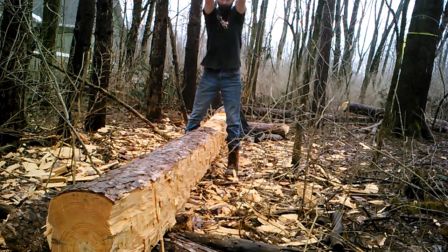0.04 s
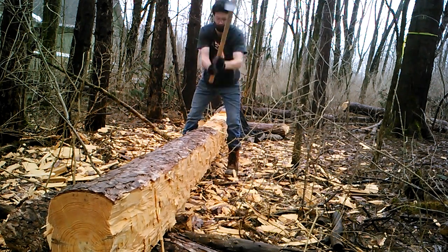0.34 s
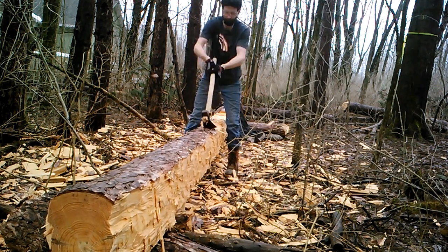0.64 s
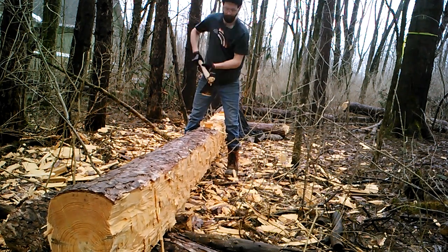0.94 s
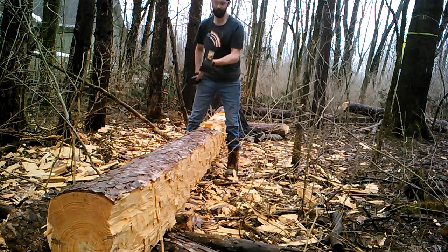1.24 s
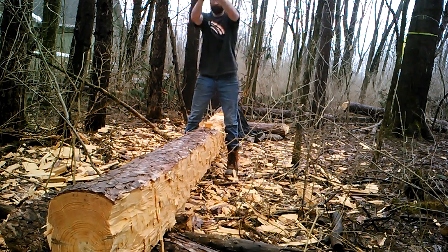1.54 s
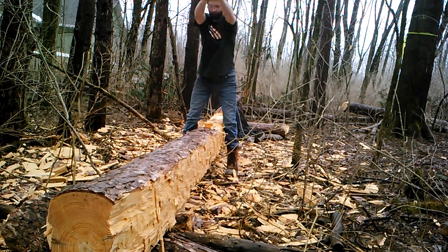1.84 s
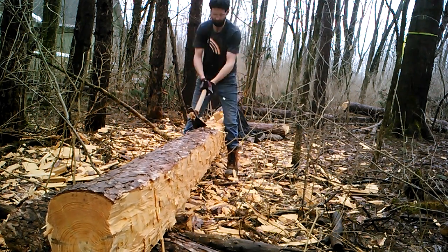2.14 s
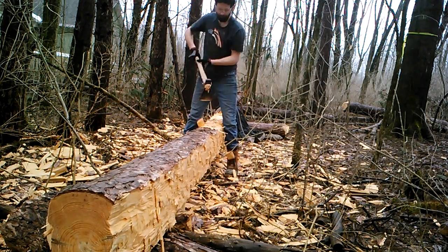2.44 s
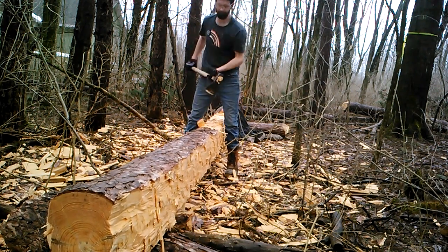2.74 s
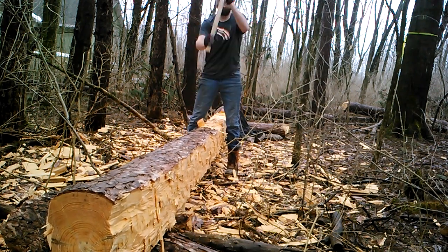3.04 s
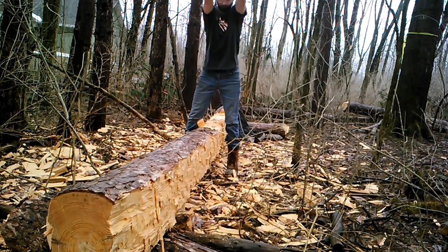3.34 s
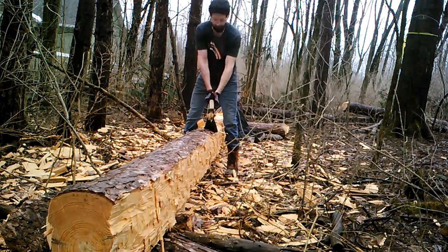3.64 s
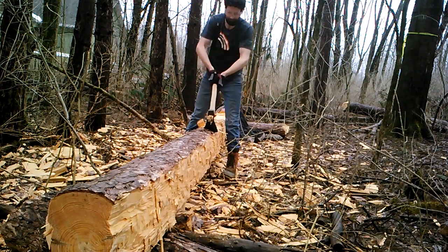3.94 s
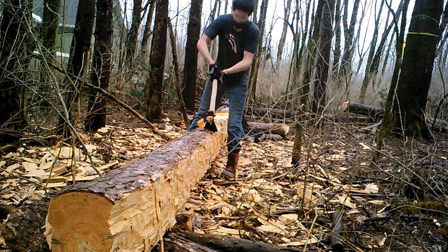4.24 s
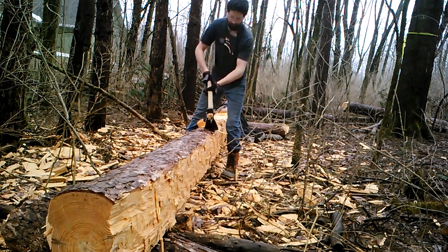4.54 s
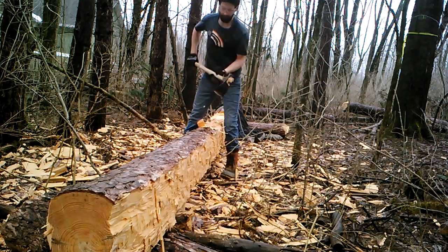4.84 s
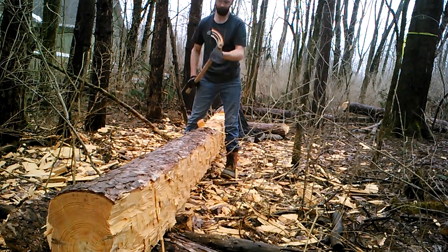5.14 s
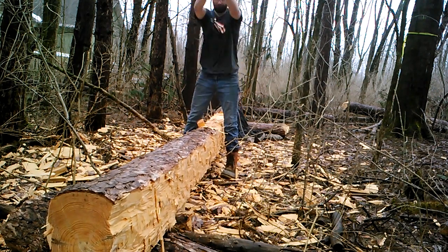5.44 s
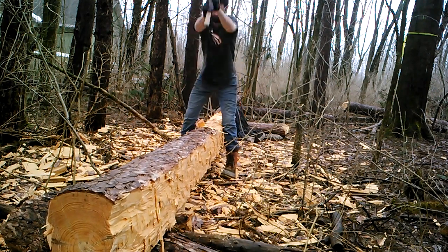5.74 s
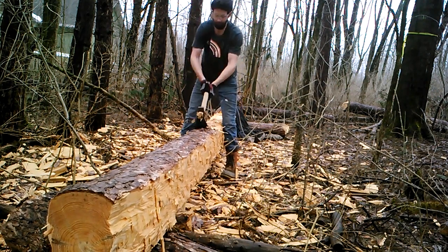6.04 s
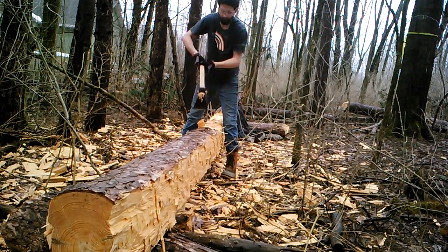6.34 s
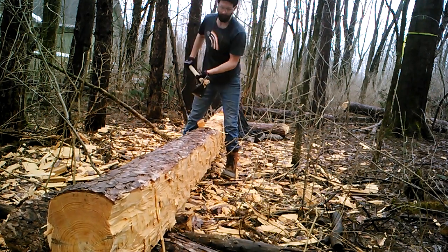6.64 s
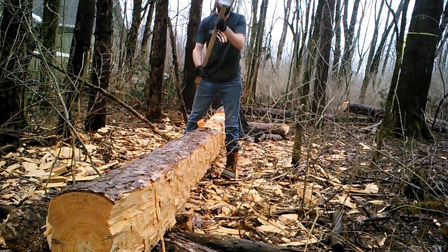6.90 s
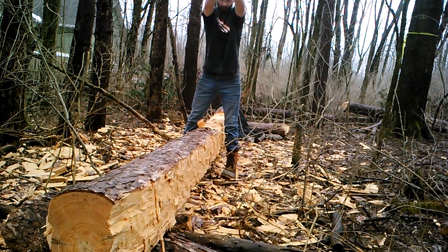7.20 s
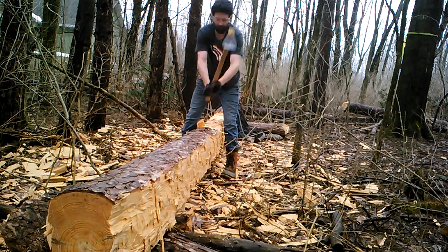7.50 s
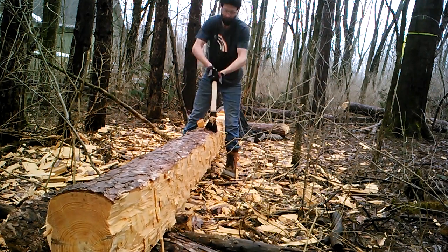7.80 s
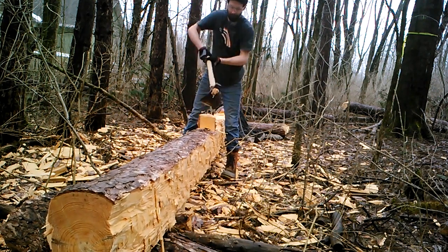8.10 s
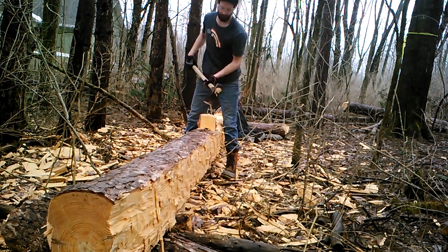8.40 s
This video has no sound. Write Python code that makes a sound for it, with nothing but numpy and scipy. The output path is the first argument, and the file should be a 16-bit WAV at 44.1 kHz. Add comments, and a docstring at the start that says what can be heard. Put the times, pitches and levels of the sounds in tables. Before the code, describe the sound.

Five loud, evenly paced adze strikes bite into a log, each a thud with a sharp crack, a brief hollow ring and a woodland echo. After each, the blade pulls free with dry snaps and crackles, the third time with a loud burst of splintering. Faint upswing rustles, settling chips and two tiny bird chirps lie over quiet air. The microphone, a few metres off, distorts slightly on the hits.

```python
"""In bare woodland, five heavy blows of an adze (an axe with a crosswise blade) land in a long log.
Each blow thuds, splits fibres and sets the log ringing; the trunks scatter the sound back.
Levering the blade free tears and snaps splinters, which drop into dry leaves, and the worker rustles
on each upswing between blows. A small bird chirps twice over quiet air.
The blows overload a microphone a few metres away."""
import sys
import numpy as np
from scipy import signal
from scipy.fft import rfft, irfft
from scipy.io import wavfile
from scipy.ndimage import uniform_filter1d

SR = 44100
rng = np.random.default_rng(int(sys.argv[2]) if len(sys.argv) > 2 else 0)


def materialize(psi):
    """Save the field psi as 16-bit PCM at rate SR to the path in sys.argv[1].

    A 1-D psi becomes a single channel; in a 2-D psi each row is a channel.
    """
    bounded = np.clip(np.atleast_2d(psi).T, -1, 1)
    quanta = np.round(bounded * 32767).astype(np.int16)
    wavfile.write(sys.argv[1], SR, quanta)


N = 381906

# Tone of the quiet air: frequency_hz, relative_db
AIR_TONE = [(19, -28), (32, -1), (83, -1.5), (133, -5.5), (191, -12.5), (296, -14.5), (497, -15),
            (595, -17), (695, -14), (1760, -24.5), (2010, -26), (2470, -27), (6770, -28.5), (9000, -31),
            (15500, -31)]
# Far echo of the woods: frequency_hz, relative_db, fade_s (a fade time is the time to drop by 60 dB)
FAR_ECHO = [(60, -17, 1.5), (300, -18, .7), (534, -16.5, 1.92), (1500, -13, 1.41), (3050, -8.5, 1.14),
            (7000, -12.5, 0.93), (10000, -10, 0.65), (15000, -22, .5)]
# Bird chirps: start_s, length_s, start_pitch_hz, end_pitch_hz, level_db
BIRD_CHIRPS = [(1.881, .028, 6350, 7230, -46.5), (7.557, 0.03, 7360, 7900, -53)]
# Tones of a splinter's bright snap and a chip's hollow body: frequency_hz, relative_db
SNAP_TONE = [(300, -35), (1500, -26.5), (3000, -4), (5000, -2), (6400, 5.5), (7500, 3), (8700, -9),
             (10500, -14), (13000, -7.5), (16000, -17)]
BODY_TONE = [(150, -38), (700, -3.5), (1100, 11), (2200, 8), (3200, -24), (8000, -19)]
# Fibres tearing as the blade comes free: middle_s, half_length_s, level_db, body_db (against the snap)
FIBRE_TEARS = [(0.733, 0.038, -39, -13), (2.327, 0.014, -40, -10), (3.956, 0.029, -32, -25),
               (4.304, 0.015, -27.5, -19), (4.338, .026, -29, -12.5), (4.732, .024, -38.5, -8),
               (6.286, .022, -37, 0), (7.884, 0.028, -34, -2.5), (7.951, 0.022, -30.5, -5)]
# Loudest snaps of breaking and tumbling wood: start_s, peak_db, body_db (against the snap)
WOOD_SNAPS = [(0.734, -9, -10), (.845, -19, -17), (1.168, -25.5, -12), (1.513, -32.5, -13),
              (2.319, -6, -22), (2.615, -19, 6), (2.793, -27.5, -1.5), (2.91, -27.5, -8.5),
              (2.963, -31, 8.5), (3.939, -7, -33), (4.2977, -0.5, -21), (4.3188, 2.5, -26),
              (4.3346, 0.5, -17.5), (4.3374, 2, -25), (4.592, -24, -10), (4.736, -19.5, -9),
              (4.750, -16.5, -27.5), (5.298, -31, -18), (6.166, -9, -25), (6.192, -15.5, 3),
              (6.297, -10, 3.5), (6.662, -27, -13), (7.932, -17, 16), (7.95, -10, 0.5)]
# Notes the log rings at, the lowest being a dull thump of the blow into the ground: pitch_hz, relative_db,
# fade_s
LOG_NOTES = [(55, -31.5, 0.55), (97, -18, .25), (116, -11, 0.15), (134.7, -5.5, 0.403), (155, -30, 1.24),
             (148.3, -16.5, 0.47), (174.2, -4.5, 0.56), (200.2, -11.5, 0.46), (219, -13.5, .16),
             (264.1, -18.5, 0.39), (288.3, -15, 0.39), (345, -14, 0.28), (404.3, -8, 0.29),
             (453.5, -6.5, 0.18), (510.2, -6, 0.11), (595.8, -5, 0.12), (713.5, -14.5, 0.19),
             (784, -19.5, 0.31)]
# Tones of the blade's thud and the crack of splitting fibres: frequency_hz, relative_db
THUD_TONE = [(25, -10.5), (70, -10.5), (130, 4), (350, -2), (600, -3.5), (950, -1), (1400, -4), (1700, -9),
             (2200, -13), (2700, -19), (5000, -27), (16000, -48)]
CRACK_TONE = [(300, -41), (1500, -19.5), (2800, -6), (4000, -2.5), (5500, 0.5), (7200, 2), (8200, -5),
              (9800, -20.5), (12500, -12), (16000, -29.5)]
# Adze blows, with relative levels: start_s, thud_db, knock_db, crack_db, ring_db,
# ring_tilt_db_per_octave, deep_notes_db, slab_pitch_hz, slab_db
ADZE_BLOWS = [(0.4895, 4, 2.5, 1.5, -7, 5, 8.5, 916, 6.5), (2.1180, 1, -2, 3.5, -3, 1, 5.5, 1463, 10.5),
              (3.6991, -1, -19, 2, 1, -1.5, -1.5, 1214, 3.5),
              (5.9993, -2.5, -3, 4.5, -0.5, -0.5, 1.5, 480.3, 5.5),
              (7.6547, 0, -1, -1.5, 1, 0, -1.5, 315, 0)]


def undb(db):
    """Turn decibels into a number to multiply by."""
    return 10 ** (np.asarray(db) / 20)


def unit(x):
    """Scale a sound to an average strength (rms) of 1."""
    return x / np.sqrt(np.mean(x ** 2))


def fade(t, fade_s):
    """Die away by 60 dB every fade_s seconds."""
    return np.exp(-np.log(1000) * t / fade_s)


def add(track, start_s, sound):
    """Mix a sound into a track at the given time."""
    i = max(int(start_s * SR), 0)
    track[i:i + len(sound)] += sound[:max(len(track) - i, 0)]


def colour(x, tone, size=4096):
    """Filter a sound to follow a tone table; white noise keeps its strength."""
    hz, db = np.transpose(tone)
    log_hz = np.log(np.maximum(np.fft.rfftfreq(size, 1 / SR), 1))
    gains = undb(np.interp(log_hz, np.log(hz), db))
    # build the filter so that it rings only after a hit, never before it
    cepstrum = irfft(np.log(gains))
    one_sided = 2 * cepstrum[:size // 2] * (np.arange(size // 2) > 0)
    response = irfft(np.exp(rfft(one_sided, size)))
    return signal.oaconvolve(x, response / np.linalg.norm(response))[:len(x)]


def grains(count, spread_db):
    """Tightly packed clicks; more spread makes their sizes more unequal."""
    noise = rng.standard_normal(count)
    boost_db = spread_db * np.minimum(rng.exponential(size=count), 2 * np.pi)
    return unit(noise * undb(boost_db))


def drift(rate_hz):
    """A smooth random wander, roughly between -1 and 1."""
    step = int(SR / rate_hz)
    return uniform_filter1d(np.repeat(rng.standard_normal(N // step + 1), step), step)[:N]


def dry_wood(clicks, body_db):
    """Small dry wood answers each click with a bright snap and a hollow body."""
    return colour(clicks, SNAP_TONE) + undb(body_db) * colour(clicks, BODY_TONE)


def rustle(middle_s, half_length_s, level_db, body_db, spread_db):
    """A swarm of tiny breaks swells and dies away."""
    out, t = np.zeros(N), np.arange(SR // 2) / SR
    swell = np.exp(-((t - t.mean()) / half_length_s) ** 2)
    clicks = grains(len(t), spread_db) * swell
    add(out, middle_s - t.mean(), undb(level_db) * dry_wood(clicks, body_db))
    return out


def air(level_db=-48, waver_db=0.4):
    """A distant rumble and soft hiss that waver very slightly."""
    noise = unit(colour(rng.standard_normal(N), AIR_TONE))
    return noise * undb(level_db + waver_db * drift(rate_hz=11))


def woods_echo(x, near_db=-1, near_fade_s=0.24, delay_s=0.0047, gain_db=-5, bands=14):
    """Nearby trunks scatter a quick, dense echo; distant ones a long tail that loses its treble."""
    t = np.arange(2 * SR) / SR
    hz, db, fade_s = np.transpose(FAR_ECHO)
    table_log_hz = np.log(hz)
    centres = np.linspace(table_log_hz[0], table_log_hz[-1], bands)
    log_hz = np.log(np.maximum(np.fft.rfftfreq(len(t), 1 / SR), 1))
    scatter = rfft(grains(len(t), spread_db=2.13))
    onset = np.clip(t / delay_s - 1, 0, 1)
    near = onset * fade(t, near_fade_s)
    response = np.zeros(len(t))
    for centre, share in zip(centres, np.eye(bands)):
        band = irfft(scatter * np.interp(log_hz, centres, share))
        far = onset * fade(t, np.interp(centre, table_log_hz, fade_s))
        decay = far / np.linalg.norm(far) + undb(near_db) * near / np.linalg.norm(near)
        response += band * decay * undb(np.interp(centre, table_log_hz, db) + gain_db)
    return signal.fftconvolve(x, response)[:len(x)]


def bird():
    """A small bird gives thin, rising whistles."""
    out = np.zeros(N)
    for start_s, length_s, start_hz, end_hz, level_db in BIRD_CHIRPS:
        pitch_hz = np.linspace(start_hz, end_hz, int(length_s * SR))
        whistle = np.sin(2 * np.pi * np.cumsum(pitch_hz) / SR)
        add(out, start_s, undb(level_db) * np.hanning(len(whistle)) * whistle)
    return out


def falling_crumbs(flight_s=1.0, spread_s=0.23, level_db=-61, per_second=80):
    """Crumbs of wood thrown by each blow sprinkle down on the dry leaves."""
    t = np.arange(N) / SR
    showers = sum(np.exp(-((t - blow_s - flight_s) / spread_s) ** 2) for blow_s, *_ in ADZE_BLOWS)
    sizes = rng.standard_normal(N) * undb(2 * rng.exponential(size=N))
    landings = sizes * (rng.random(N) < per_second / SR)
    crinkle = rng.standard_normal(SR // 20) * fade(t[:SR // 20], 0.036)
    patter = unit(signal.fftconvolve(landings, crinkle)[:N])
    return undb(level_db) * dry_wood(patter * showers, body_db=-7)


def falling_chips(flight_s=0.32):
    """What each tear breaks off drops into the dry leaves after a short fall."""
    return sum(rustle(tear_s + flight_s, half_length_s=0.05, level_db=-51, body_db=-6.5, spread_db=5.5)
               for tear_s, *_ in FIBRE_TEARS)


def settling_chips(delay_s=0.5, length_s=1.1, start_db=-48.5, drop_db_per_s=5, scatter_db=2, count=4):
    """After each blow a few loose chips tip over one by one, ever more faintly."""
    out = np.zeros(N)
    for blow_s, *_ in ADZE_BLOWS:
        waits_s = length_s * (np.arange(count) + rng.random(count)) / count
        for wait_s, strength in zip(waits_s, rng.standard_normal(count)):
            tip_s = blow_s + delay_s + wait_s
            db = start_db - drop_db_per_s * wait_s + scatter_db * strength
            out += rustle(tip_s, half_length_s=0.006, level_db=db, body_db=-9, spread_db=2)
    return out


def upswings(lead_s=0.505):
    """Before every blow but the first, the worker rustles as the adze goes up."""
    return sum(rustle(blow_s - lead_s, half_length_s=0.034, level_db=-48, body_db=-8, spread_db=3.5)
               for blow_s, *_ in ADZE_BLOWS[1:])


def snap(peak_db, body_db, click_fade_s=0.003, body_fade_s=0.016, rattle_fade_s=0.074, size=4096):
    """One chip gives a very short click, a hollow woody knock and a faint rattle."""
    t = np.arange(size) / SR
    rattle = undb(-25) * fade(t, rattle_fade_s)
    click = unit(colour(rng.standard_normal(size) * (fade(t, click_fade_s) + rattle), SNAP_TONE))
    body = unit(colour(rng.standard_normal(size) * (fade(t, body_fade_s) + rattle), BODY_TONE))
    chip = click + undb(body_db) * body
    return chip / np.abs(chip).max() * undb(peak_db)


def splinters(crackle_boost_db=13, scatter_db=2.5, crackles_per_tear=4):
    """Levering the blade tears fibres; thin ones crackle, the thickest break with a snap."""
    out = sum(rustle(*tear, spread_db=5) for tear in FIBRE_TEARS)
    for middle_s, half_length_s, level_db, body_db in FIBRE_TEARS:
        for offset, strength in rng.uniform(-0.89, 1, (crackles_per_tear, 2)):
            crackle_s = middle_s + 1.2 * half_length_s * offset
            add(out, crackle_s, snap(level_db + crackle_boost_db + scatter_db * strength, body_db))
    for start_s, peak_db, body_db in WOOD_SNAPS:
        add(out, start_s, snap(peak_db, body_db))
    return out


def log_ring(build_cycles=2.4, deep_below_hz=140, gain_db=1):
    """The whole log rings over a low thump into the ground; where the blade lands sets the balance of its
    notes."""
    out, t = np.zeros(N), np.arange(SR) / SR
    hz, note_db, fade_s = np.transpose(LOG_NOTES)
    octaves_from_loudest = np.log2(hz / hz[np.argmax(note_db)])
    # long bending waves travel slowly, so the deep notes build up last
    build_up = 1 - np.exp(-(hz[:, None] * t / build_cycles) ** 2)
    swell = build_up * fade(t, fade_s[:, None])
    # the log rocks on its supports, which bends the pitch by about 1 %
    rocking = 0.014 * drift(rate_hz=22)
    for start_s, _, _, _, ring_db, tilt_db, deep_db, _, _ in ADZE_BLOWS:
        bent_t = t + np.cumsum(np.roll(rocking, -int(start_s * SR))[:SR]) / SR
        notes = swell * np.sin(2 * np.pi * hz[:, None] * bent_t)
        balance_db = tilt_db * octaves_from_loudest + deep_db * (hz < deep_below_hz)
        add(out, start_s, undb(note_db + balance_db + ring_db + gain_db) @ notes)
    return out


def adze_cuts(bite_s=0.0055, thud_fade_s=0.097, knock_fade_s=0.11, split_fade_s=0.049, tear_fade_s=0.24,
              thud_gain_db=5, crack_gain_db=-2, tear_db=-16, slab_fade_cycles=50):
    """The blade sinks in with a thud, fibres split and tear, and the loosened slab knocks and rings."""
    t = np.arange(SR // 2) / SR
    bite = np.minimum(t / bite_s, 1) ** 2  # the force grows as the wedge goes in
    thuds, knocks, cracks, slabs = np.zeros((4, N))
    for start_s, thud_db, knock_db, crack_db, *_, slab_hz, slab_db in ADZE_BLOWS:
        split = grains(len(t), spread_db=0.93) * fade(t, split_fade_s)
        tear = undb(tear_db) * grains(len(t), spread_db=3.5) * fade(t, tear_fade_s)
        thud = rng.standard_normal(len(t)) * bite * fade(t, thud_fade_s)
        knock = rng.standard_normal(len(t)) * bite * fade(t, knock_fade_s)
        slab = np.sin(2 * np.pi * slab_hz * t) * bite * fade(t, slab_fade_cycles / slab_hz)
        add(thuds, start_s, undb(thud_db + thud_gain_db) * thud)
        add(knocks, start_s, undb(knock_db) * knock)
        add(cracks, start_s + bite_s, undb(crack_db + crack_gain_db) * (split + tear))
        add(slabs, start_s, undb(slab_db) * slab)
    return colour(thuds, THUD_TONE) + colour(knocks, BODY_TONE) + colour(cracks, CRACK_TONE) + slabs


def stereo(x, side_db=-9, above_hz=8800, size=64):
    """Two close microphone openings: only the highest treble reaches left and right differently."""
    ripple = rng.standard_normal(size)
    side = signal.fftconvolve(x, ripple / np.linalg.norm(ripple))[:N]
    side = signal.sosfilt(signal.butter(6, above_hz, "high", fs=SR, output="sos"), side)
    return x + undb(side_db) * side * np.array([[1], [-1]])


def scene(small_echo_db=-7, directions=3):
    """All the work happens straight ahead, wrapped in the echo of the woods."""
    small_sounds = splinters() + upswings() + falling_chips() + settling_chips()
    small_sounds += falling_crumbs() + bird()
    ring = log_ring()
    # splitting wood sends a different sound each way, so its echoes blend into a smooth wash
    wash = sum(woods_echo(adze_cuts()) for _ in range(directions)) / np.sqrt(directions)
    echo = wash + woods_echo(ring + undb(small_echo_db) * small_sounds)
    return stereo(adze_cuts() + ring + small_sounds + echo) + air()


def record(dry, ceiling=0.79, hardness=5.0, top_hz=15800):
    """The microphone overloads on each blow, squashing the peaks; the very highest treble is cut."""
    squashed = dry / (1 + np.abs(dry / ceiling) ** hardness) ** (1 / hardness)
    return signal.sosfilt(signal.ellip(8, 0.2, 70, top_hz, fs=SR, output="sos"), squashed)


dry = scene()
out = record(dry)
materialize(out)
```